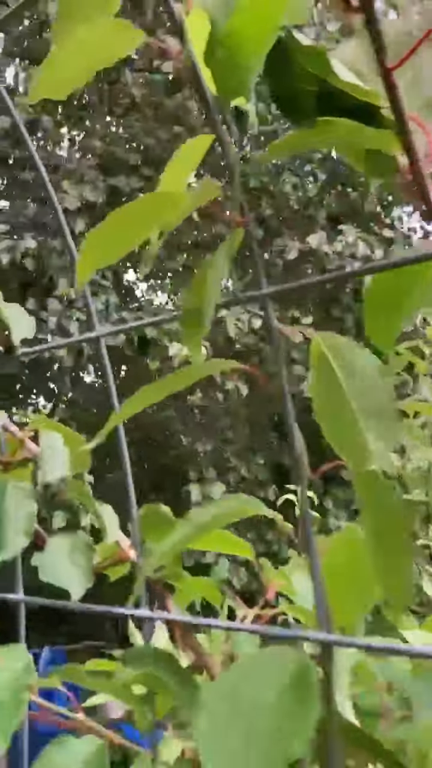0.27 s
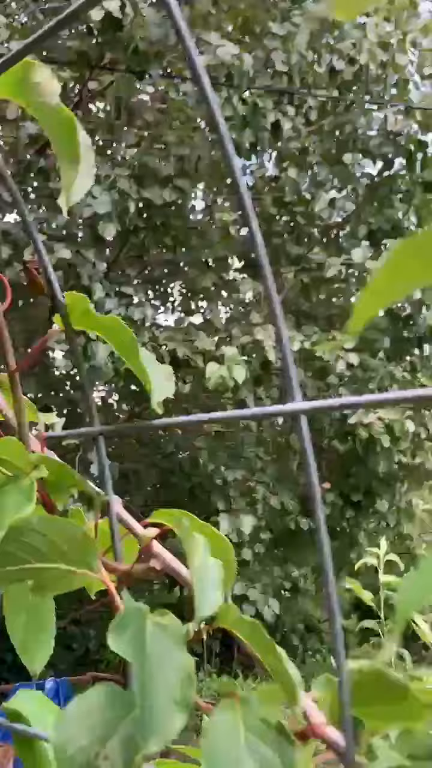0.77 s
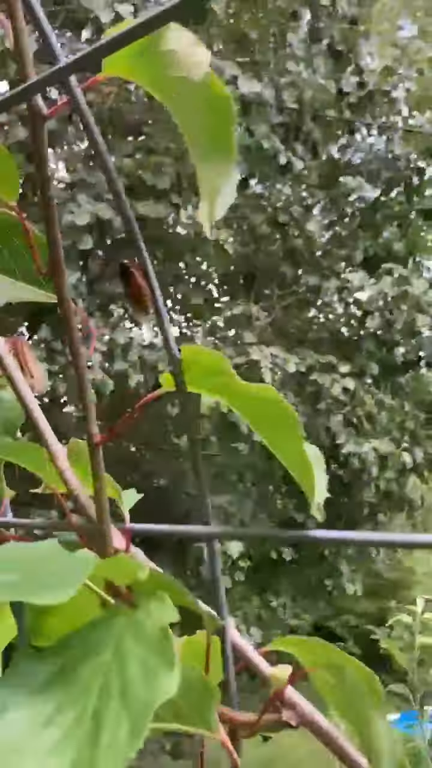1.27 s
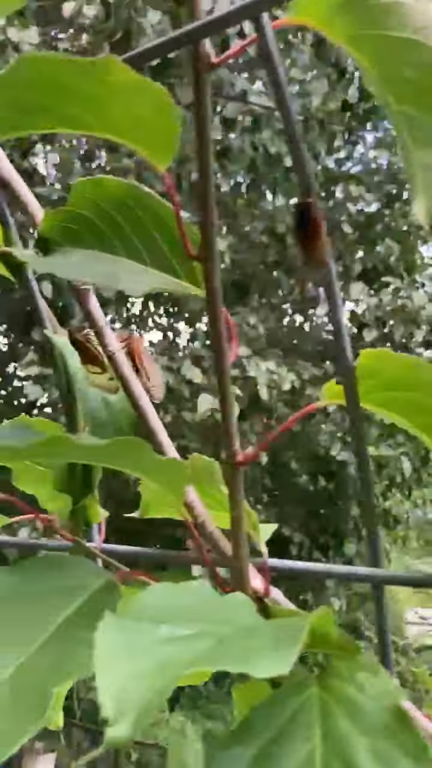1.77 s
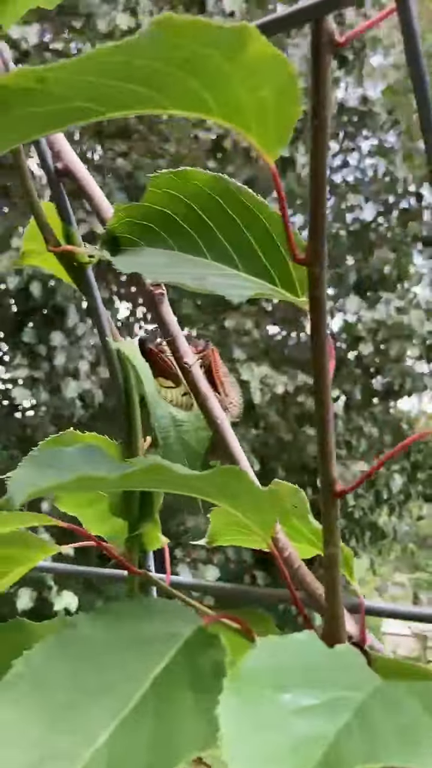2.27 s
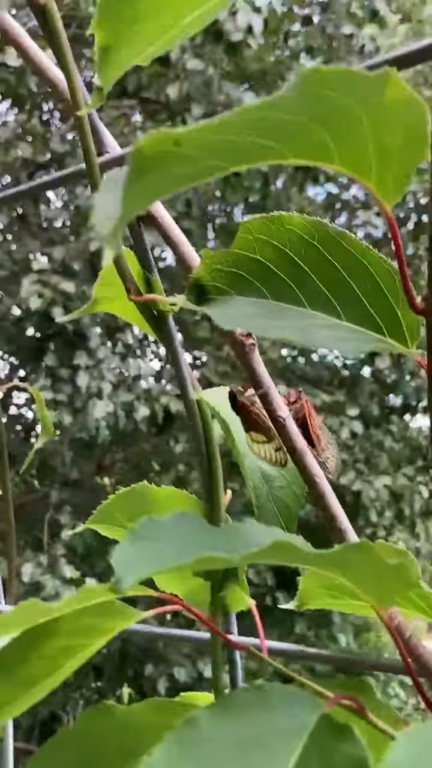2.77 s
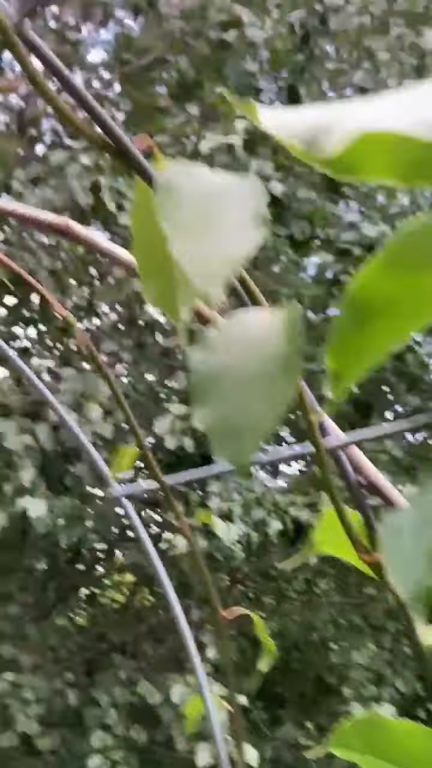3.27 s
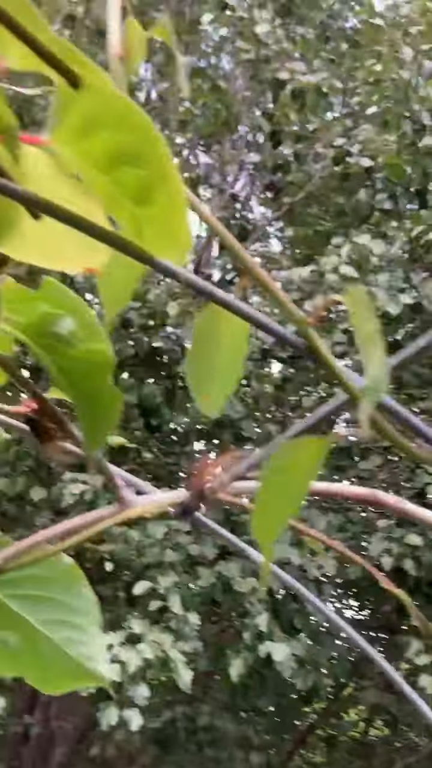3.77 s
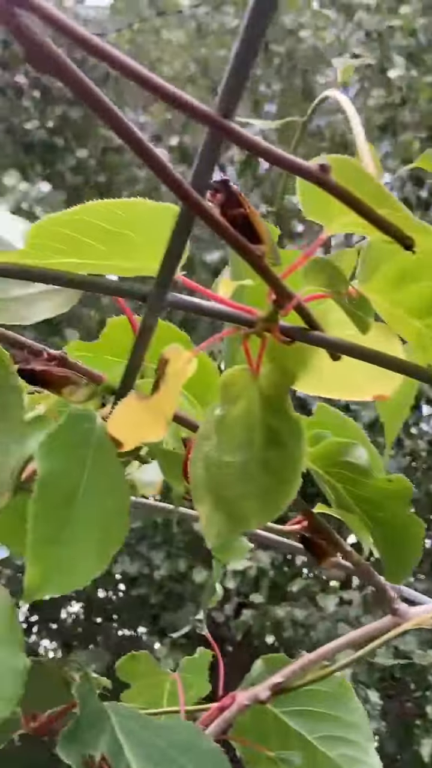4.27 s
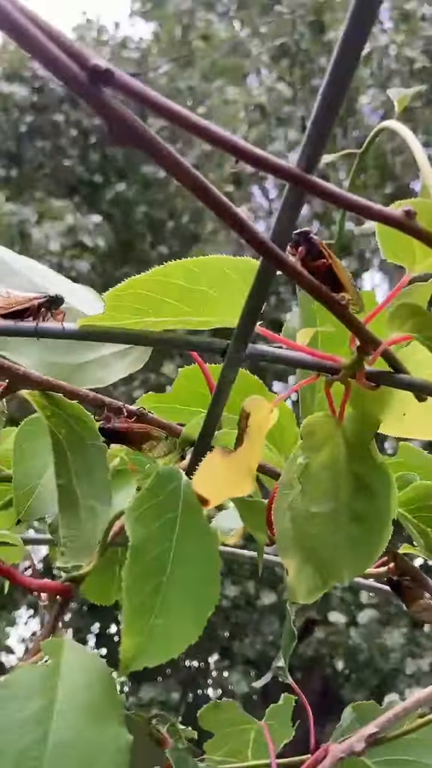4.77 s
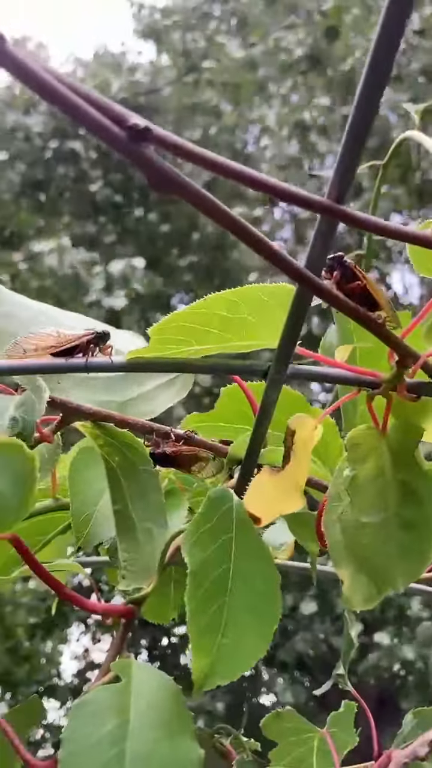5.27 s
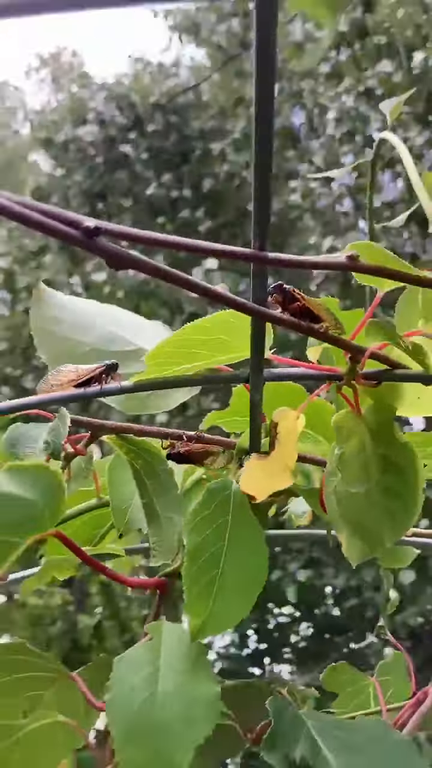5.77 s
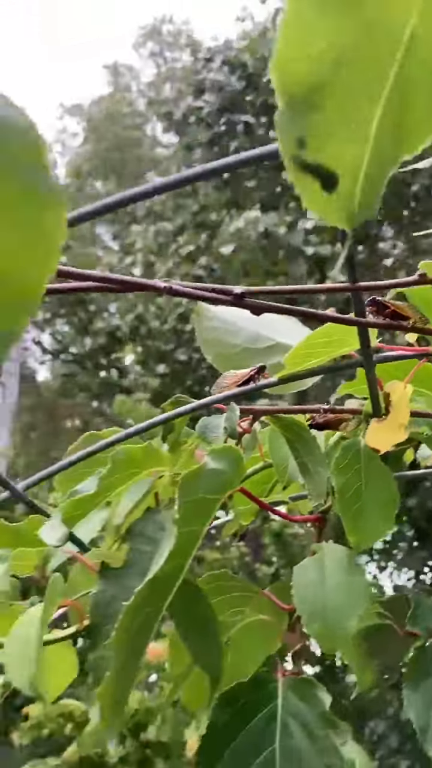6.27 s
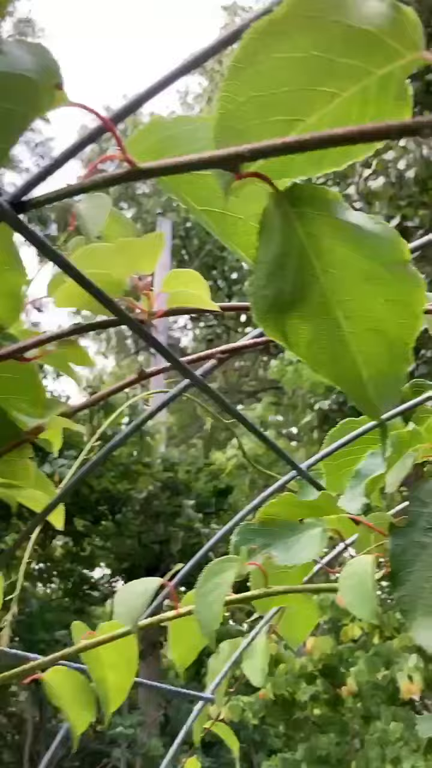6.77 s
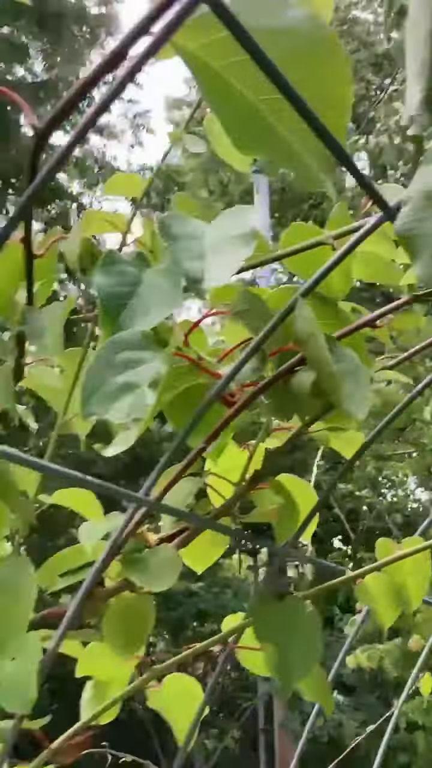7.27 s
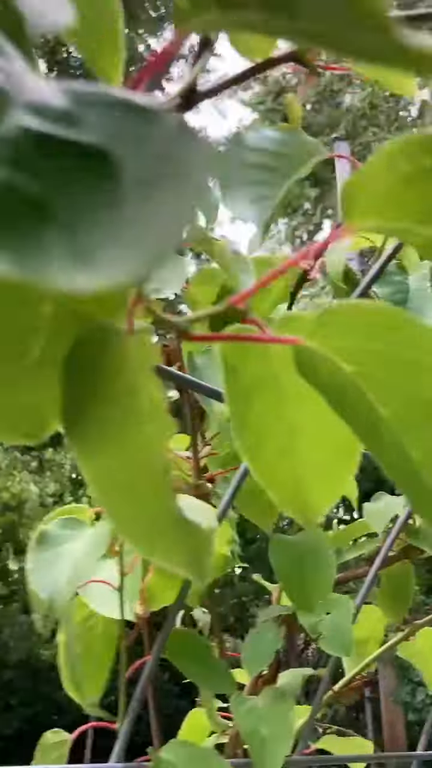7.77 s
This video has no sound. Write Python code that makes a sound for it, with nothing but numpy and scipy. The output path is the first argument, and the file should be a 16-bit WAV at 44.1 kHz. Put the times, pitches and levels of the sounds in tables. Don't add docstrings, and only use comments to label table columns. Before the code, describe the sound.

A handheld stereo microphone moves among garden leaves. Wind softly presses on it at the start while a high crackling cicada chorus grows, joined by near buzzes that stop suddenly. The noise drops back and single crisp ticks follow, about sixteen a second, with lower replies. A very short, loud, harsh zip cuts through, then a grainy buzz, while low wind bumps return over faint far hum.

```python
import sys
import numpy as np
from scipy import signal
from scipy.fft import rfft, irfft, next_fast_len
from scipy.io import wavfile
from scipy.ndimage import uniform_filter1d, map_coordinates

SR = 44100
rng = np.random.default_rng(int(sys.argv[2]) if len(sys.argv) > 2 else 0)


def wrap_up_sound(samples):
    columns = np.atleast_2d(samples).T
    tamed = np.clip(columns, -1, 1)
    steps = np.round(tamed * 32767).astype(np.int16)
    wavfile.write(sys.argv[1], SR, steps)


def level_to_linear(level):
    exponent = np.asarray(level, float) / 20
    return 10 ** exponent


N = 354123
SIZE = next_fast_len(N)
HZ = np.fft.rfftfreq(SIZE, 1 / SR)
T = np.arange(N) / SR

# [t/s, effort/dB, brightness/dB]
CHORUS_EFFORT = [(0, -3.5, 4), (.3, -2, 0.5), (1, 0.5, -1.3), (2, 2, 0.5), (2.5, 3.5, -1.2), (3.1, 6, 0.2),
                 (3.6, 8.5, -0.5), (4.0, 1.5, -3), (4.3, -2, -1.5), (4.7, -2, -0.5), (5.4, 0, -1.5),
                 (6.2, -1, -1.5), (6.55, -2, 0.2), (6.9, 2, -3.5), (7.3, 0.5, -2.5), (8.03, -2.5, 0)]
# [t/s, effort level/dB, tymbal pitch f/Hz]
NEAR_SINGERS = [
    [(2.45, -28, 6190), (2.82, -24.5, 6150), (2.95, -29, 6430), (3.16, -25, 5770)],
    [(3.14, -52, 6500), (3.2, -23, 6860), (3.33, -20, 7040), (3.56, -21, 6590), (3.85, -60, 6400)],
    [(6.25, -39, 6450), (6.31, -27, 6660), (6.345, -18, 6380), (6.385, -13, 7010), (6.405, -14.5, 6700),
     (6.416, -17, 6050), (6.425, -36.5, 6040), (6.47, -21.5, 6230)],
    [(6.78, -64, 6800), (6.9, -30.5, 6130), (7.0, -23.5, 6020), (7.1, -22, 6030), (7.2, -27.5, 5720),
     (7.3, -22.5, 5830), (7.35, -30, 5990), (7.4, -65, 5960)],
    [(6.35, -32, 4750), (6.383, -22, 4900), (6.394, -26.5, 4700), (6.404, -18.5, 4780), (6.42, -28, 4700),
     (6.45, -20, 4910), (6.48, -46, 4780)],
]
# [belly level/dB, rasp level/dB, sheen level/dB]
SINGER_COLOURS = [(-14, -18, 4), (-8, -3.5, 3), (2, 15, 0.5), (-28, 6, 1), (2.5, -20, 4)]
# [buckle rate f/Hz, weak-side level/dB, leaf echo delay/ms, echo share/1, blur share/1, drum note level/dB]
SINGER_VOICES = [(200, -2, .4, .15, 1.0, -3), (204, -2, .4, .08, 1.2, -1), (230, -2, .45, .15, 1.0, -4),
                 (191, -2, .645, .95, 1.2, -4), (115, -3, .4, .1, .6, -2)]
# [t/s, peak level/dB]
NEAR_TICKS = [(4.5034, -16), (4.5418, -19), (4.5932, -20), (4.6565, -16), (4.7129, -17), (4.7718, -16),
              (4.8296, -17), (4.8915, -20), (4.9514, -18), (5.0162, -16), (5.0845, -18), (5.1479, -17),
              (5.2128, -17), (5.2781, -23), (5.3395, -17), (5.4033, -17), (5.4702, -17), (5.536, -20),
              (5.6123, -17), (5.6812, -16), (5.749, -18), (5.8144, -15), (5.8738, -21), (5.9351, -21),
              (5.9985, -22), (6.0568, -23), (6.1212, -19)]
# [t/s, peak level/dB]
CHORUS_TICKS = [(0.0722, -21), (0.1945, -19), (0.2708, -18), (0.3067, -20), (0.3272, -16), (0.4035, -22),
                (0.4673, -21), (0.5327, -21), (0.0199, -20), (0.2453, -21), (0.5901, -22), (0.6499, -23),
                (0.6719, -20), (0.6893, -20), (0.7811, -23), (0.8081, -20), (1.056, -22), (1.287, -23),
                (1.3578, -21), (1.491, -22), (1.6706, -20), (1.724, -20), (2.0752, -21), (2.3276, -22)]
# [f/Hz, level/dB]
BODY_RING = [(1800, -55), (2600, -39), (3300, -25), (4000, -12), (4500, -9), (5000, -11), (5500, -1.5),
             (6000, 2), (6500, 0), (7000, -5), (7600, -13), (8500, -13.5), (9500, -24), (10300, -22.5),
             (11800, -23)]
# [f/Hz, level/dB per Hz]
FAR_HUM = [(12, -49), (20, -33), (36, -9), (70, -14), (88, 11), (107, -6.5), (190, -6), (267, -11),
           (526, -18), (1460, -23), (1730, -25.5), (2380, -28.5), (3200, -39), (4160, -20.5), (7040, -120)]
# [f/Hz, level/dB]
WIND_PRESSURE = [(20, -24.5), (40, -8), (65, -1), (120, -5.5), (250, -14.5), (700, -34), (1500, -63)]
# [t/s, peak level/dB, length/s]
PORT_GUSTS = [(0, -48.5, 0.17), (.4, -63.5, 0.92), (3.15, -79.5, 0.31), (4.5, -70, 0.62), (5.8, -67, 0.61),
              (6.42, -56, 0.11), (6.9, -64, 0.34), (7.27, -48, 0.35), (7.43, -55, 0.073), (7.57, -46, 0.12),
              (7.76, -55, 0.23), (7.9, -62, 0.37)]
# [t/s, peak level/dB, length/s, pitch f/Hz]
HOUSING_BUMPS = [(2.55, -62, 0.046, 88.3), (3.202, -60.5, 0.39, 80.2), (6.152, -51, 0.048, 111),
                 (6.416, -57, 0.12, 88), (6.99, -49, 0.038, 72), (7.205, -50.5, 0.03, 90),
                 (7.235, -48, 0.037, 115), (7.28, -52, 0.041, 55), (7.43, -55, 0.048, 130),
                 (7.542, -50, 0.037, 85), (7.595, -46, 0.026, 160), (7.629, -51, 0.034, 80),
                 (8.0, -59, 0.05, 70)]
# [f/Hz, likeness/0-1]
PORT_LIKENESS = [(250, .95), (450, .75), (750, .45), (1500, .65), (2400, .5), (3200, .17), (4200, .25),
                 (4800, .5), (5500, .9), (6100, .6), (7200, .6), (7950, .999), (9300, .999), (10100, .4),
                 (11200, .97)]
# [f/Hz, phase/rad]
LEFT_LEAD = [(2800, .2), (3400, 2.4), (4300, 2.2), (5100, 3.0), (5600, 3.2), (6800, 4.4), (7900, 6.28),
             (9300, 6.28), (10100, 7.4), (10500, 8.9), (11300, 9.42)]
# [t/s, pitch that cancels in the sum f/Hz, scatter level/dB]
TREE_BEARING = [(0, 4860, -3.5), (.5, 5360, -1), (1.2, 5480, -1), (1.9, 5640, -2), (2.35, 5710, 1.5),
                (2.55, 5820, 2), (2.7, 5560, 7), (2.78, 5400, -2.5), (3.03, 5550, 7.5), (3.13, 5410, 5),
                (3.3, 5400, -7), (3.899, 5130, -3.5), (4.3, 5190, 7), (5.0, 5210, 3), (5.5, 5300, 4.5),
                (5.9, 5280, 7.5), (6.24, 5290, 8.5), (6.3, 5600, -15), (6.38, 5330, 2.5), (6.43, 5730, 15),
                (6.7, 5700, -1), (6.9, 4976, -23), (7.35, 4900, -5), (7.42, 5700, 4.5)]
# [t/s, level change/dB, length/ms]
TREBLE_LOSSES = [(1.255, -14.5, 26), (1.952, -27, 14.3), (2.139, -37, 13), (2.278, -9.5, 10.5),
                 (2.485, -5, 20), (3.16, -16, 20.4), (3.625, -28, 17), (3.833, -25, 16.5), (4.876, 6.5, 10),
                 (6.481, -14, 7.2), (7.365, -2, 23), (7.802, -12, 13)]
# [f/Hz, level/dB]
PATCH_THRESHOLD = [(300, -60), (1400, -50), (2300, -49), (3300, -37), (4500, -27), (6000, -23),
                   (7500, -21), (9000, -24), (9900, -25), (10700, -28), (11500, -32)]
# [t/s, peak level/dB, length/s]
TOP_FIZZ = [(4.515, -77, .03), (4.59, -71, .03), (4.655, -65, 0.042), (4.705, -78, 0.059),
            (4.772, -72, .03), (5.025, -72, 0.033), (5.075, -79, 0.039), (5.145, -73, .03),
            (5.335, -73, 0.033), (5.4, -74, .03)]

CHORUS_DB, DRUM_SHARE = -27, 0.61
BELLY_DB, BELLY_SHARE, RASP_DB, RASP_SHARE = 2, 0.27, 2.45, 0.17
SOFT_SPREAD, SOFT_RASP = 0.44, 0.038
BELLY_HZ, RASP_HZ, SHEEN_HZ, DRUM_WIDTH_HZ = 5100, 7400, 9200, 600
LEAF_SWAY = 0.038
NOTE_HZ, NOTE_FROM_HZ, NOTE_TO_HZ, NOTE_MS = 6500, 7500, 6000, 5.5
DULL_S, DULL_DB = 5.32, -5
ANSWER_S, ANSWER_GAP_S, SLOWING_S = 5.521, .0565, .0006
ANSWER_DB, ANSWER_ARCH_DB = -13, -6
HUM_DB, HUM_DIP_SHARE, OPEN_S = -57.5, 0.15, 0.12
DRONE_HZ, DRONE_WIDTH_HZ = 1427, 250
DRONE_DB, DRONE_RISE_DB, DRONE_S, DRONE_RISE_S = -74.5, 9, 5.4, 0.38
MOTOR_HZ, MOTOR_WIDTH_HZ = 84.9, 8.1
MOTOR_DB, MOTOR_FADE_DB_PER_S, MOTOR_FAR_DB = -56, -2.5, -85.5
CALM_DB, RUMBLE_DB, THUMP_DB = -78, -56, 0
LOW_DIP_S, LOW_DIP_DB, LOW_DIP_LENGTH_S = 7.8, -13, 0.3
CANCEL_HZ, CANCEL_WIDTH_HZ = 5350, 1300
SCATTER_DB, SCATTER_HZ = 3.5, 12
LOUD_DB, DUCK, LAG_S, RECOVER_DB_PER_S = -18.5, 1.68, 0.051, 47
SUM_LOSS_HZ, EDGE_HZ, FIZZ_LOW_HZ, FIZZ_HIGH_HZ = 5000, 11700, 10300, 12000
GRID, THIN, LIFT_DB = 543, .3, 4
SPARSE_HZ, SPARSE_DB, SPARSE_THIN = 9350, 5, 1.1
GAP_LOW_HZ, GAP_HIGH_HZ, GAP_DB = 4700, 5950, 3


def chorus(count=24, spread_db=2.0, swell_db=3.5, tick_db=4.0):
    effort_db, bright_db = columns(CHORUS_EFFORT)
    level_db = CHORUS_DB + DRUM_SHARE * effort_db
    belly_db = BELLY_DB + BELLY_SHARE * effort_db
    rasp_db = RASP_DB + RASP_SHARE * effort_db + bright_db
    drifts = slow(18.0, count)
    out = np.zeros((2, N))
    for k in range(count):
        ticking = k % 4 == 0
        rate = rng.uniform(12, 19) if ticking else rng.uniform(185, 265)
        steps = np.arange(160 if ticking else 2200)
        times = (steps + rng.random() + .06 * rng.standard_normal(len(steps))) / rate
        draws = rng.random((2, len(steps), 16))
        swell = drifts[k][np.clip((times * SR).astype(int), 0, N - 1)]
        size = level_to_linear(spread_db * rng.standard_normal() + swell_db * swell + tick_db * ticking)
        size = size * (times > 0) * (times < T[-1])
        out += buckles(times, size, draws, 3.5)
    return level_to_linear(level_db) * shaded(evened(body(out)), belly_db, rasp_db)


def singer(rows, belly_db, rasp_db, sheen_db, rate, weak_db, echo_ms, echo, blur, note_db):
    level_db, hz = columns(rows)
    soft_db = level_db.max() - level_db
    start, end = rows[0][0], rows[-1][0]
    sounding = (T > start) & (T < end)

    steps = np.arange(220)
    times = start + (steps + 0.051 * rng.standard_normal(len(steps))) / rate
    sizes = level_to_linear(weak_db * (steps % 2))
    drive = buckles(times, sizes, rng.random((2, len(steps), 40)), 3.6)
    drive /= np.sqrt(np.mean(drive[:, sounding] ** 2))
    drive += blur * rng.standard_normal((2, N))

    voice = body(drive + 0.8 * resonate(drive, hz, DRUM_WIDTH_HZ), 2.9)
    voice = shaded(voice, belly_db + SOFT_SPREAD * soft_db, rasp_db + SOFT_RASP * soft_db)
    voice += (level_to_linear(sheen_db) - 1) * above(voice, SHEEN_HZ)

    bend = np.interp(times, T, hz) / NOTE_HZ
    side = (-1.) ** steps
    draws = rng.random((2, len(steps), 2))
    note = snaps(times, sizes, draws, NOTE_FROM_HZ, NOTE_TO_HZ, NOTE_MS, bend[:, None], side[:, None])
    match = np.sqrt(np.mean(voice[:, sounding] ** 2) / np.mean(note[:, sounding] ** 2))
    voice += level_to_linear(note_db) * note * match

    arch = np.sin(np.pi * np.clip((T - start) / (end - start), 0, 1))
    voice = echoed(voice, sounding * echo_ms * (1 - LEAF_SWAY * arch), echo)
    voice /= np.sqrt(np.mean(voice[:, sounding] ** 2))
    fade = np.clip(np.minimum(T - start, end - T) / 0.022, 0, 1)
    return level_to_linear(level_db) * fade * voice


def ticker(rows, rasp_db, ribs_db, note_db, note_hz, length_ms=5.0, belly_db=-9):
    s, peak_db = np.transpose(rows)
    ribs = buckles(s - .0015, level_to_linear(peak_db + ribs_db), rng.random((2, len(s), 24)), length_ms)
    ribs = shaded(body(ribs), belly_db, rasp_db)
    bright_db = peak_db + rasp_db + note_db - 9 + DULL_DB * (s > DULL_S)
    bright = snaps(s - .0006, level_to_linear(bright_db), rng.random((2, len(s), 2)), 9000, 7900, 3.0)
    draws = rng.random((2, len(s), 2))
    note = snaps(s - .0002, level_to_linear(peak_db + note_db), draws, 1.22 * note_hz, note_hz, length_ms)
    return ribs - above(ribs, 9200) + bright + note


def answers(count=11):
    k = np.arange(count)
    times = ANSWER_S + ANSWER_GAP_S * k + SLOWING_S * k ** 2
    peak_db = ANSWER_DB + ANSWER_ARCH_DB * (2 * k / (count - 1) - 1) ** 2
    return np.transpose([times, peak_db])


def buckles(times, sizes, draws, length_ms):
    out = np.zeros((2, N))
    place, strength = np.split(draws, 2, axis=-1)
    at = np.round((times[:, None] + place * length_ms / 1000) * SR).astype(int)
    height = sizes[:, None] * np.sin(np.pi * place ** 0.48) * (2 * strength - 1)
    for path in range(2):
        out[path] = np.bincount(np.clip(at[path], 0, N - 1).ravel(), height[path].ravel(), N)
    return out


def snaps(times, sizes, draws, from_hz, to_hz, length_ms, bend=1, side=1):
    out = np.zeros((2, N))
    t = np.arange(300) / SR
    u = np.clip(t / length_ms * 1000, 0, 1)
    turns = np.cumsum(to_hz + (from_hz - to_hz) * (1 - u) ** 2) / SR
    swell = np.sin(np.pi * u ** 0.7)
    at = np.clip(np.round(times * SR).astype(int)[:, None] + np.arange(len(t)), 0, N - 1)
    tune, phase = draws[0].T[:, :, None]
    for path in range(2):
        cycles = turns * bend * (0.96 + 0.08 * tune) + phase + side * path / 4
        np.add.at(out[path], at, sizes[:, None] * np.sin(2 * np.pi * cycles) * swell)
    return out


def body(x, sweep_ms=2.0):
    delay = sweep_ms / 1000 * np.clip((9000 - HZ) / 4000, 0, 1)
    phase = -2j * np.pi * np.cumsum(delay) * HZ[1]
    return filtered(x, level_to_linear(read(BODY_RING, HZ)) * np.exp(phase))


def shaded(x, belly_db, rasp_db):
    upper, rasp = above(x, BELLY_HZ), above(x, RASP_HZ)
    return level_to_linear(belly_db) * (x - upper) + upper + (level_to_linear(rasp_db) - 1) * rasp


def resonate(x, hz, width):
    turn = np.exp(2j * np.pi * np.cumsum(hz * np.ones(N)) / SR)
    r = np.exp(-np.pi * width / SR)
    return 2 * (turn * signal.lfilter([1 - r], [1, -r], x / turn + 1e-18)).real


def echoed(x, delay_ms, share):
    at = np.flatnonzero(delay_ms)
    out = x.copy()
    for bounce in (1, 2):
        places = at - at[0] - bounce * delay_ms[at] * SR / 1000
        level = (3 - bounce) * share ** bounce
        out[:, at] += [level * map_coordinates(path[at], [places], order=5) for path in x]
    return out


def background():
    hum = filtered(rng.standard_normal((2, N)), level_to_linear(read(FAR_HUM, HZ)))
    hum = above(hum, 194.3, 26)
    hum /= np.sqrt(np.mean((hum - above(hum, 1000, 10)) ** 2))
    hum_db = HUM_DB + HUM_DIP_SHARE * low_dip_db()
    drone_db = DRONE_DB + DRONE_RISE_DB / (1 + np.exp((DRONE_S - T) / DRONE_RISE_S))
    motor_db = np.maximum(MOTOR_DB + MOTOR_FADE_DB_PER_S * T, MOTOR_FAR_DB)
    drone = level_to_linear(drone_db) * narrow_noise(DRONE_HZ, DRONE_WIDTH_HZ)
    motor = level_to_linear(motor_db) * narrow_noise(MOTOR_HZ, MOTOR_WIDTH_HZ)
    return level_to_linear(hum_db) * np.minimum(T / OPEN_S, 1) * hum + drone + motor


def narrow_noise(hz, width):
    return evened(resonate(resonate(rng.standard_normal((2, N)), hz, width), hz, width))


def wind():
    puffs = filtered(rng.standard_normal((2, N)), level_to_linear(read(WIND_PRESSURE, HZ)))
    lumps = slow(22, count=2)
    rumble_level = level_to_linear(RUMBLE_DB + low_dip_db()) + 0.91 * swells([row[:3] for row in HOUSING_BUMPS])
    rumble = evened(puffs[0] - above(puffs[0], 220, 35)) * rumble_level * level_to_linear(1.9 * lumps[0])
    gusts = evened(puffs[1]) * (level_to_linear(CALM_DB) + swells(PORT_GUSTS)) * level_to_linear(2.4 * lumps[1])
    for s, db, length, hz in HOUSING_BUMPS:
        rumble += swells([(s, db + THUMP_DB, length)]) * np.cos(2 * np.pi * hz * (T - s))
    return np.array([rumble + gusts, rumble - gusts])


def low_dip_db():
    return LOW_DIP_DB * np.exp(-((T - LOW_DIP_S) / (LOW_DIP_LENGTH_S / 2)) ** 4)


def ports(x):
    hz, t, z = signal.stft(x, SR, nperseg=512)
    s, cancel_hz, scatter_db = np.transpose(TREE_BEARING)
    stir_db = SCATTER_DB * np.interp(t, T, slow(SCATTER_HZ, count=1)[0])
    band = np.exp(-((hz[:, None] - CANCEL_HZ) / CANCEL_WIDTH_HZ) ** 2)
    heard_hz = hz[:, None] * (CANCEL_HZ / np.interp(t, s, cancel_hz)) ** band
    scatter = level_to_linear(band ** 2 * (np.interp(t, s, scatter_db) + stir_db))
    same = np.clip(1 - (1 - read(PORT_LIKENESS, heard_hz)) * scatter, 0, 1)
    shared = np.sqrt((1 + same) / 2) * z[0]
    apart = np.sqrt((1 - same) / 2) * z[1]
    turn = np.exp(.5j * read(LEFT_LEAD, heard_hz))
    pair = np.array([(shared + apart) * turn, (shared - apart) / turn])
    return signal.istft(pair, SR, nperseg=512)[1][:, :N]


def ducked(x):
    power_db = 10 * np.log10(abs(uniform_filter1d((x ** 2).mean(0), size=800)) + 1e-12)
    fall = T * RECOVER_DB_PER_S
    over_db = np.maximum(np.maximum.accumulate(power_db + fall) - fall - LOUD_DB, 0)
    r = np.exp(-1 / (LAG_S * SR))
    return x / level_to_linear(DUCK * signal.lfilter([(1 - r) ** 2], [1, -2 * r, r * r], over_db))


def patchy(x, whim_db=6, rival_db=-6, line_db=3, low_db=-6):
    pair = np.roll([x[0] + x[1], x[0] - x[1]], -GRID, axis=1) / 2
    hz, t, z = signal.stft(pair, SR, nperseg=2048, noverlap=1024)
    power = uniform_filter1d(uniform_filter1d(abs(z) ** 2, size=16, axis=1), size=2, axis=2)
    loudest = uniform_filter1d(power.sum(0), size=48, axis=0).max(0)
    loudest = np.sqrt(uniform_filter1d(loudest, size=4) * np.median(loudest))

    sum_only = np.array([1, 0])[:, None, None]
    sheen = (hz > SPARSE_HZ)[:, None] * sum_only
    gap = ((hz > GAP_LOW_HZ) & (hz < GAP_HIGH_HZ))[:, None] * sum_only
    rival = power[::-1] * level_to_linear(2 * rival_db + 2 * low_db * (hz < 4400))[:, None]
    rival = rival * np.array([hz > 1000, hz >= 0])[..., None]
    rival *= level_to_linear(SPARSE_DB * sheen + 2 * GAP_DB * gap)
    threshold = np.maximum(loudest * level_to_linear(2 * read(PATCH_THRESHOLD, hz))[:, None], rival)

    blocks = rng.standard_normal((2, len(hz) // 16 + 1, len(t) // 2 + 1))
    whim = blocks.repeat(16, axis=1).repeat(2, axis=2)[:, :len(hz), :len(t)]
    margin_db = 10 * np.log10(power / threshold + 1e-20) + whim_db * whim
    step = threshold * level_to_linear(2 * line_db)
    weakest = np.maximum(step * level_to_linear(-LIFT_DB), (THIN + SPARSE_THIN * sheen) * power)
    kept = z * (margin_db > 0) * (abs(z) ** 2 > weakest)
    kept *= level_to_linear(SPARSE_DB / 2 * sheen + GAP_DB / 2 * gap)
    lift = (hz > 4600)[:, None] * step * level_to_linear(LIFT_DB) / (abs(z) ** 2 + 1e-20)
    kept *= np.sqrt(np.maximum(1, lift))
    pair = signal.istft(kept, SR, nperseg=2048, noverlap=1024)[1][:, :N]
    total, difference = np.roll(pair, GRID, axis=1)
    return np.array([total + difference, total - difference])


def evened(x):
    return x / np.sqrt(np.mean(x ** 2) + 1e-20)


def read(points, hz):
    f, value = np.transpose(points)
    return np.interp(np.log(hz + 1), np.log(f + 1), value)


def columns(rows):
    s, *values = np.transpose(rows)
    return [np.interp(T, s, v) for v in values]


def filtered(x, gain):
    return irfft(rfft(x, SIZE) * gain, SIZE)[..., :N]


def above(x, hz, width=150):
    return filtered(x, 1 / (1 + np.exp(np.clip((hz - HZ) / width, -50, 50))))


def slow(rate, count):
    steps = rng.standard_normal((count, N // 64 + 402))
    lowpass = signal.butter(2, rate, fs=SR / 64, output="sos")
    smooth = signal.sosfiltfilt(lowpass, steps)[:, 200:-200]
    return np.array([np.interp(T, np.arange(len(s)) * 64 / SR, evened(s)) for s in smooth])


def swells(rows):
    return sum(level_to_linear(db) * np.exp(-((T - s) / (length / 2)) ** 2) for s, db, length in rows)


def scene():
    air = chorus()
    for rows, colour, voice in zip(NEAR_SINGERS, SINGER_COLOURS, SINGER_VOICES):
        air += singer(rows, *colour, *voice)
    air += ticker(NEAR_TICKS, 6, 1, -3, 5900, 6.0)
    air += ticker(CHORUS_TICKS, 1, 5, -3, 5900)
    air += ticker(answers(), -3, 6, -7, 5100, belly_db=-4)
    return ports(air + background()) + wind()


def roll_off(x):
    return signal.sosfilt(signal.butter(12, 12250, fs=SR, output="sos"), x)


def record(dry):
    loss_db = sum(db * np.exp(-((T - s) / (ms / 2000)) ** 4) for s, db, ms in TREBLE_LOSSES)
    total = dry.mean(0)
    top = above(total, SUM_LOSS_HZ, 60) + above(dry - total, RASP_HZ, 60)
    kept = patchy(ducked(dry + (level_to_linear(loss_db) - 1) * top))
    hiss = above(rng.standard_normal(N), FIZZ_LOW_HZ)
    fizz = evened(hiss - above(hiss, FIZZ_HIGH_HZ)) * swells(TOP_FIZZ)
    return roll_off(kept - above(kept, EDGE_HZ, 25) + fizz)


dry = scene()
out = record(dry)
wrap_up_sound(out)
```